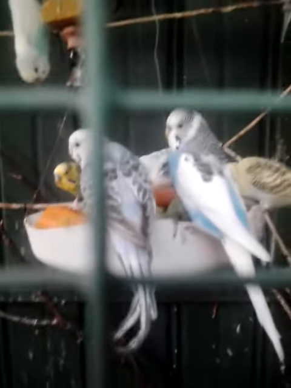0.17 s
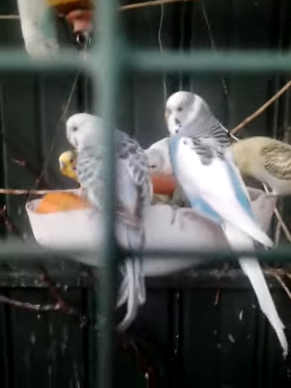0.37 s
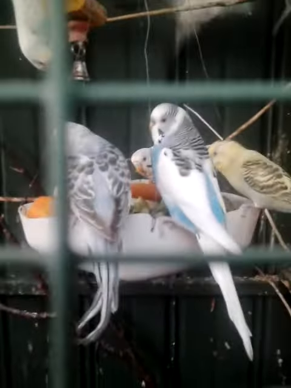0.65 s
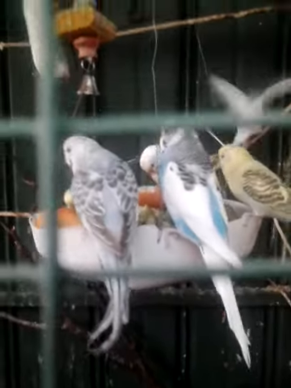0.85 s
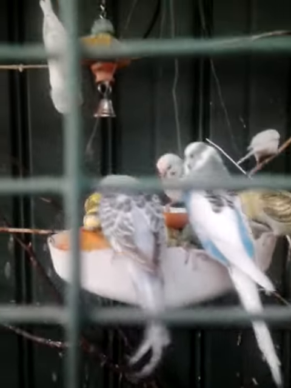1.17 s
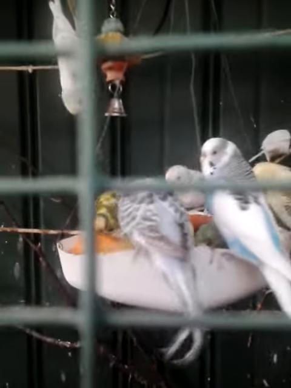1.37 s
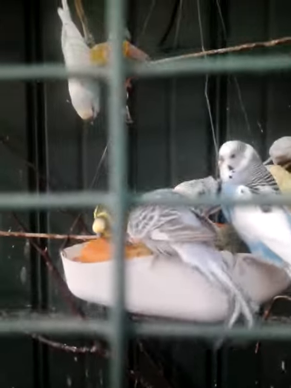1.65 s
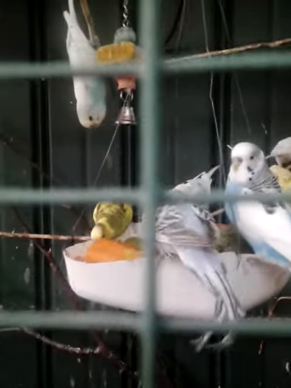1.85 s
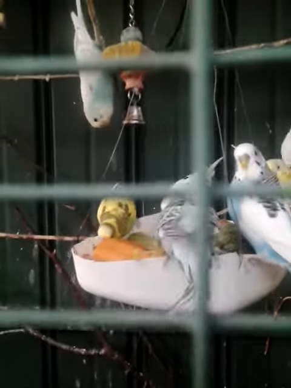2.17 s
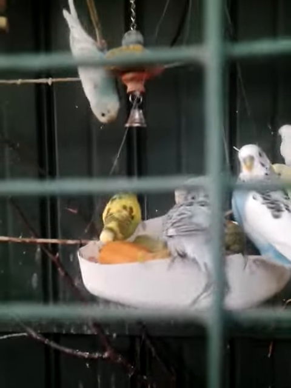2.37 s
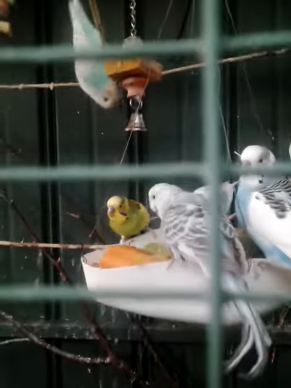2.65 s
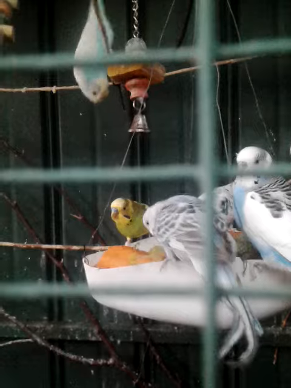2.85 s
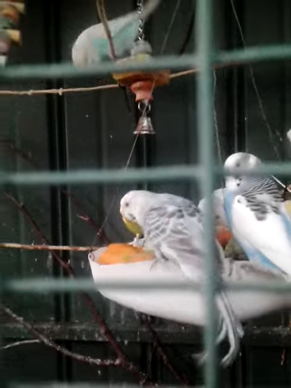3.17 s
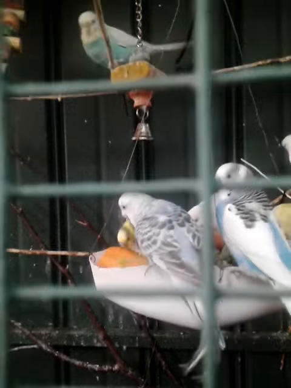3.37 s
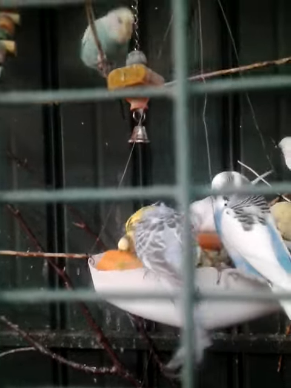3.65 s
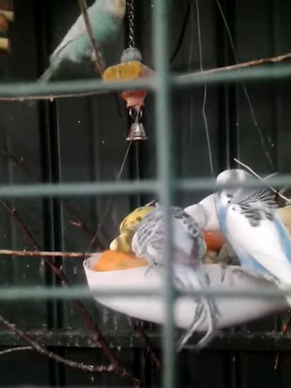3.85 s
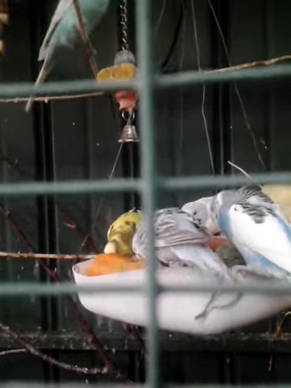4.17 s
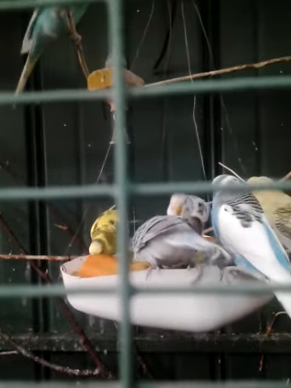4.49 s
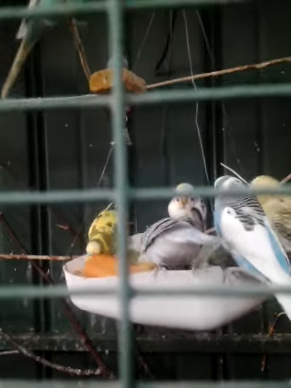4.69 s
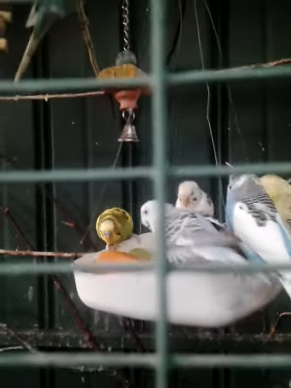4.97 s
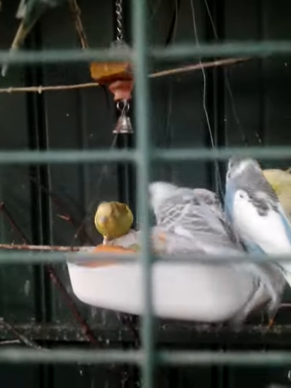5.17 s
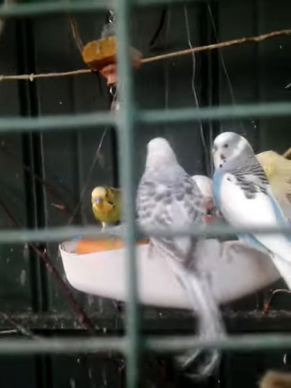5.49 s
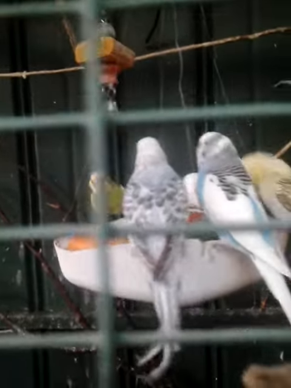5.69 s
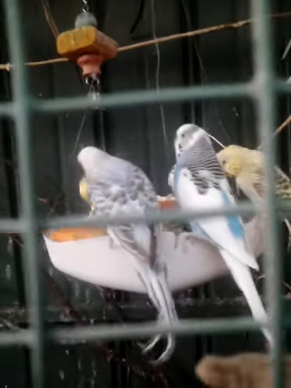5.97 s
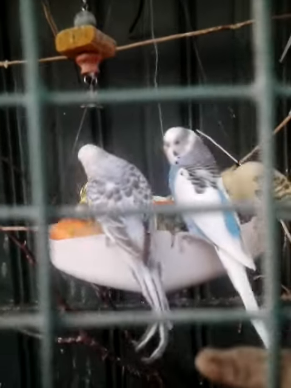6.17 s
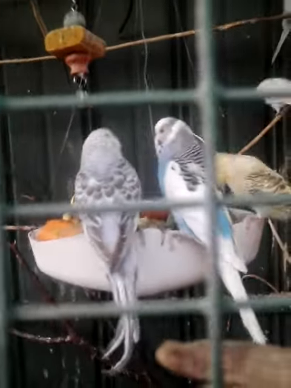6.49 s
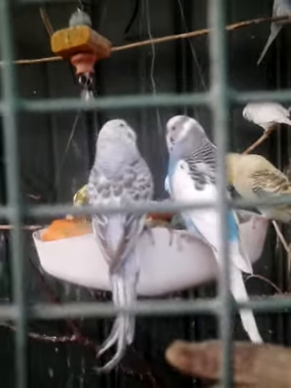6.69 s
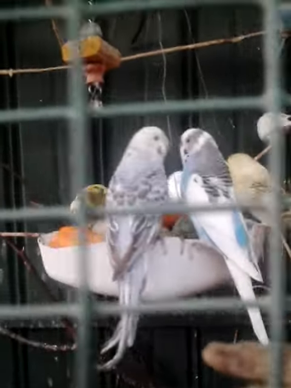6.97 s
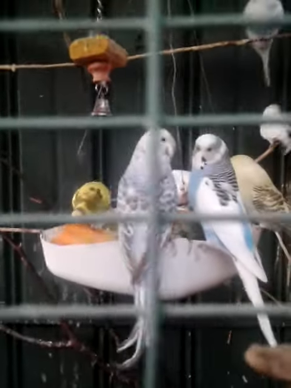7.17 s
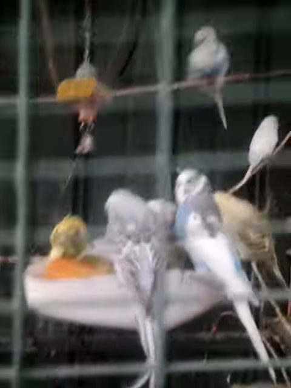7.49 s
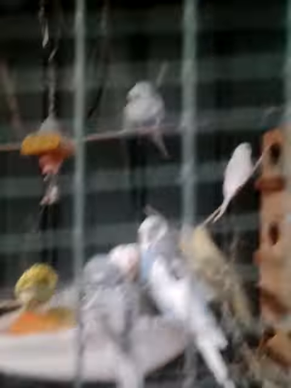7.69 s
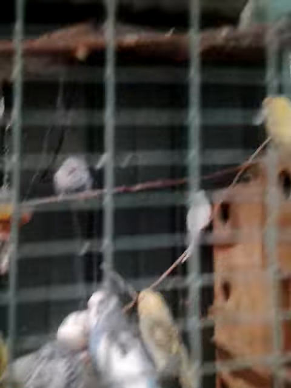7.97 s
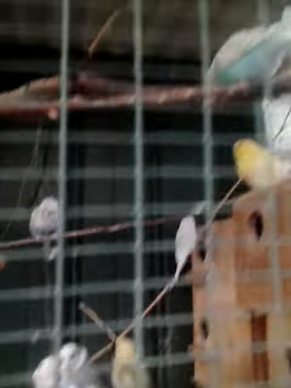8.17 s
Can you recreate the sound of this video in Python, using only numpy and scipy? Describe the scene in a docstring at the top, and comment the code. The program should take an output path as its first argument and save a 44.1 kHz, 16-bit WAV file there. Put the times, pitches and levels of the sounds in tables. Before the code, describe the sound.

A flock of small parrots trades short, high chirps and scolding squawks in an aviary, with a little wing flapping and faint pecking.

```python
"""A flock of budgerigars chatters at a food bowl in a sheet-metal aviary.
Thin membranes in each bird's voice box vibrate in quick gliding notes, clean or buzzy, and in harsh
scolding squawks. A four-note phrase keeps coming back, and the metal walls add short echoes.
One bird flutters to a perch, beaks and claws tick, and feathers ruffle.
Faint far-off whistles and a soft rumble and hiss lie underneath."""
import sys
import numpy as np
from scipy import signal
from scipy.fft import rfft, irfft
from scipy.io import wavfile

SR = 44100
rng = np.random.default_rng(int(sys.argv[2]) if len(sys.argv) > 2 else 0)


def pcm_store(signal):
    """Save signal as 16-bit PCM."""
    levels = np.round(np.clip(np.atleast_2d(signal), -1, 1) * 32767)
    wavfile.write(sys.argv[1], SR, levels.astype(np.int16).T)


N = 367794
TIME = np.arange(N) / SR

# Pitch shapes: multiples of a note's base pitch, at even steps from start to end
SLIDE = [0.96, 0.92, .85, .71, .68]
SAG = [0.98, .88, .8, .73]
DIVE = [1, .87, .74, 0.53, 0.434]
ARCH = [0.8, 0.9, 0.97, .9, .74, 0.49]
RISE = [.77, .88, .96, 1]
HOLD = [1.01, 0.97]
# Gliding notes: t/s, length/s, base pitch f/Hz, level/dB
SLIDES = [(1.432, 0.066, 3720, -29.5), (2.3, 0.026, 4100, -29), (2.6, 0.055, 3500, -36.5),
          (4.219, 0.055, 3270, -37), (4.37, 0.032, 3640, -37), (4.708, 0.059, 4170, -39.5),
          (5.129, 0.025, 4930, -23.5), (6.551, 0.045, 3046, -24), (7.8, 0.059, 4140, -39.5)]   # chirps that slide down
SAGS = [(1.291, 0.076, 1896, -46), (2.333, 0.056, 2675, -35), (2.512, 0.044, 1688, -40.5),
        (2.87, 0.04, 2720, -32.5), (6.335, 0.042, 2000, -38), (6.576, 0.043, 2156, -27),
        (6.593, 0.054, 3930, -27)]   # lower notes that sink gently
DIVES = [(5.886, 0.017, 2740, -29.5), (6.172, 0.013, 2540, -34.5), (6.226, 0.04, 2885, -32),
         (6.628, 0.014, 1837, -35.5)]   # steep drops that end a call
ARCHES = [(1.487, 0.054, 3593, -22.5), (2.207, 0.041, 3735, -25.5), (2.42, 0.03, 1506, -40),
          (2.818, 0.045, 3900, -23.5), (4.294, 0.062, 3450, -33.5), (4.402, 0.032, 3225, -27.5),
          (6.187, .04, 3970, -21.5), (6.355, .038, 4360, -25.5), (7.399, 0.055, 3390, -25)]   # notes that swing up, then fall
RISES = [(1.385, 0.017, 3350, -38), (1.41, 0.031, 2650, -38.5), (2.562, 0.043, 4490, -44),
         (2.645, 0.031, 4440, -40.5), (3.106, 0.05, 3176, -31.5), (4.201, 0.037, 4800, -41.5),
         (4.381, 0.043, 6370, -51), (4.756, .065, 3566, -36), (5.109, 0.028, 5120, -25.5),
         (5.512, 0.021, 3510, -42.5), (6.13, 0.014, 3870, -36), (6.369, 0.084, 2595, -36.5),
         (6.527, .035, 3410, -25.5), (7.753, 0.1, 4410, -45), (7.869, 0.018, 4530, -32)]   # notes that climb
# Notes held near one pitch: t/s, length/s, f/Hz, level/dB, roughness (0 is clean)
HELD_NOTES = [(0, 0.034, 2800, -36, 0.75), (0.03, 0.047, 2634, -39.5, 0.76),
              (1.655, 0.035, 3780, -32.5, 0.18), (1.694, 0.09, 3725, -38, 0.06),
              (2.541, 0.12, 1089, -42.5, 0), (2.758, 0.02, 2413, -29.5, 0.16),
              (2.798, 0.019, 2860, -26, 0.08), (2.968, 0.032, 6230, -14.5, 0.02),
              (3.025, 0.016, 6250, -15.5, 0.3), (3.084, .012, 3570, -27, 0.4),
              (3.692, 0.021, 2310, -47.5, 0.83), (4.284, 0.029, 3210, -34.5, 0.72),
              (4.67, 0.023, 2960, -41.5, .9), (4.876, 0.024, 5890, -26.5, 0.1),
              (5.549, 0.071, 2400, -43.5, 1.1), (6.323, 0.011, 1820, -43, 0.9),
              (6.417, .024, 3500, -25.5, 0.36), (6.439, 0.012, 5660, -28, 0.1),
              (6.44, 0.018, 2790, -23.5, 0.2), (6.508, 0.023, 2080, -27, 0.53),
              (6.588, 0.038, 3010, -25, 0.25), (6.923, 0.0093, 2063, -36, 1.1)]
def chatter():
    """The flock trades six kinds of short note; each gliding kind has a set roughness."""
    out = np.zeros(N)
    kinds = [(SLIDE, SLIDES, .18), (SAG, SAGS, .27), (DIVE, DIVES, .25),
             (ARCH, ARCHES, .18), (RISE, RISES, .42)]
    for shape, notes, rough in kinds:
        for start, length, hz, db in notes:
            add(out, start, chirp(shape, length, hz, db, rough))
    for start, length, hz, db, rough in HELD_NOTES:
        add(out, start, chirp(HOLD, length, hz, db, rough))
    return out


def chirp(shape, length, hz, db, rough=0.11, flutter_db=4.0, wobble=.022):
    """One fluttering note wobbles along a pitch shape and gets rougher as it sinks."""
    n = int(length * SR)
    glide = np.interp(np.linspace(0, len(shape) - 1, n), np.arange(len(shape)), shape)
    pitch = hz * glide * (1 + wobble * wander(n, 170))
    tone = whistle(pitch, np.minimum(rough + (1 - glide) ** 2, 1))
    flutter = from_db(flutter_db * wander(n, 120))
    return from_db(db) * wall_echoes(unit_power(tone * swell(n, crest=0.42) * flutter))


# How well throat and beak pass each frequency: f/Hz, level/dB
VOICE_COLOUR = [(1000, -15.5), (2600, 0), (3450, 2), (4900, -3), (7600, -1.5), (11000, -14.5)]
def whistle(pitch, rough):
    """A tone and two overtones pass through throat and beak; a forced voice has stronger overtones."""
    phase, strength = voice_box(pitch, rough, buzz_hz=420, jitter=.11, buzz_depth=.2)
    step_db = -19 + 11 * rough + 3 * wander(len(pitch), 170)   # from one overtone to the next
    return strength * sum(from_db(at_hz(VOICE_COLOUR, k * pitch) + (k - 1) * step_db) * np.sin(k * phase)
                          for k in range(1, 4))


def voice_box(pitch, rough, buzz_hz, jitter, buzz_depth):
    """Membranes vibrate while a fast, uneven buzz shakes their pitch and strength."""
    n = len(pitch)
    buzz = np.sin(phase_of(buzz_hz * (1 + .5 * wander(n, 100))))
    shaken = pitch * (1 + rough * (jitter * wander(n, 700) + buzz_depth * buzz))
    return phase_of(shaken), np.exp(.5 * rough * buzz)


# The returning phrase: t/s, level/dB of its last note
PHRASES = [(2.023, -26), (5.714, -28.5), (6.012, -20.5), (7.22, -25)]
def phrases():
    """A pip, an upward flick, a dive and a louder slide, always in the same rhythm."""
    out = np.zeros(N)
    for start, db in PHRASES:
        add(out, start, chirp(SAG, length=0.012, hz=3900, db=-36))
        add(out, start + 0.043, chirp(RISE, length=0.025, hz=4720, db=db - 25))
        add(out, start + 0.073, chirp(DIVE, length=0.046, hz=3450, db=db - 11.5))
        add(out, start + 0.132, chirp(SLIDE, length=0.04, hz=4100, db=db))
    return out


# Scolding squawks: t/s, length/s, f/Hz, level/dB
SQUAWKS = [(1.527, 0.0093, 2290, -29.5), (2.312, 0.029, 3050, -35), (2.674, 0.02, 3060, -30.5),
           (2.949, 0.052, 3145, -18), (3.002, 0.043, 3815, -16.5), (3.047, 0.028, 3750, -20),
           (5.154, 0.042, 4900, -17), (6.458, 0.046, 2840, -27.5), (7.879, 0.034, 4100, -24),
           (7.929, 0.022, 3485, -25.5)]
def squawks(throat_width_hz=1420, beak_hz=6190, beak_width_hz=2070, beak_db=-5, spurt_db=3):
    """Driven hard, the membranes shake wildly; tone and puffs of air ring in throat and open beak."""
    out = np.zeros(N)
    for start, length, hz, db in SQUAWKS:
        n = int(length * SR)
        phase, strength = voice_box(np.full(n, hz), 0.61, buzz_hz=248.7, jitter=0.092, buzz_depth=0.05)
        breathy_tone = strength * (np.sin(phase) + 3.2 * rng.standard_normal(n))
        throat = ring(breathy_tone, hz, throat_width_hz)
        beak = from_db(beak_db) * ring(breathy_tone, beak_hz, beak_width_hz)
        spurts = from_db(spurt_db * wander(n, 180))
        voice = filtered(throat - beak, 1900, "high", order=4) * spurts
        add(out, start, from_db(db) * wall_echoes(unit_power(voice * swell(n, crest=0.33))))
    return out


# The path of one unbroken rasping call: t/s, f/Hz before the dips, level/dB
RASP = [(4.877, 3242, -24.5), (4.939, 3533, -23.5), (4.969, 2900, -26), (4.998, 3000, -36.5),
        (5.025, 3804, -28), (5.044, 3840, -57)]
def rasp(dip=0.05, roll_db=0.5):
    """A longer call rolls in uneven pulses, its pitch dipping on each."""
    out = np.zeros(N)
    start, end = RASP[0][0], RASP[-1][0]
    hz, db = (column[(TIME >= start) & (TIME < end)] for column in in_time(RASP))
    roll = wander(len(hz), 300)
    pitch = hz / (1 + dip * np.exp(roll))
    tone = whistle(pitch, rough=0.28) * from_db(-roll_db * roll)
    add(out, start, wall_echoes(from_db(db) * unit_power(tone)))
    return out


# How loud the wings are: t/s, level/dB
FLIGHT = [(.45, -70.5), (.58, -48.5), (.86, -44), (.94, -37.5), (1.08, -48), (1.25, -66), (2.27, -68.5),
          (2.37, -43.5), (2.62, -62)]
# Tone colour of the air they push: f/Hz, relative level/dB
WING_AIR = [(130, 2.5), (200, -4), (350, 8), (680, -9.5), (6400, -15.5), (14000, -78.5)]
def wings(beat_hz=17, beat_db=2.0):
    """Each wing stroke pushes a puff of air."""
    flight_db, = in_time(FLIGHT)
    strokes_db = beat_db * np.sin(2 * np.pi * beat_hz * TIME)
    return from_db(flight_db + strokes_db) * coloured_noise(WING_AIR)


# Knocks on wood: t/s, level/dB
TAPS = [(.775, -49), (.821, -38), (0.902, -33.5), (1.595, -45), (3.379, -48.5), (4.69, -40)]
def perch_taps():
    """Wings and claws strike the perches."""
    out = np.zeros(N)
    for start, db in TAPS:
        add(out, start, click(db, decay_s=0.017))
    return out


def pecks(count=30, db=-56, spread_db=8):
    """Beaks crack seed and tick on the bowl at random moments."""
    out = np.zeros(N)
    for when, softness in rng.random((count, 2)):
        add(out, when * N / SR, click(db - spread_db * softness, decay_s=0.0023))
    return out


def click(db, decay_s):
    """A quick hit makes a burst of noise that dies at once and echoes off the walls."""
    t = np.arange(SR // 10) / SR
    noise = unit_power(filtered(rng.standard_normal(len(t)), [500, 7000], "band"))
    return from_db(db) * wall_echoes(noise * np.exp(-t / decay_s))


# Birds shaking out their feathers: t/s, length/s
RUFFLES = [(0.1, 0.41), (5.34, 0.35)]
def ruffles(gain_db=-55):
    """Feathers slide over each other in a soft swell of hiss."""
    out = np.zeros(N)
    for start, length in RUFFLES:
        n = int(length * SR)
        hiss = filtered(rng.standard_normal(n), [4000, 11000], "band")
        add(out, start, from_db(gain_db) * hiss * np.hanning(n))
    return out


# Faint calls from far off: t/s, length/s, f/Hz
FAR_CALLS = [(0.394, 0.18, 3855), (0.502, 0.093, 1315), (0.952, 0.22, 4980), (3.922, 0.14, 2770),
             (6.781, 0.42, 5240), (6.796, 0.63, 2570)]
def far_birds(db=-58, wobble=0.035):
    """Thin held whistles, blurred by distance."""
    out = np.zeros(N)
    for start, length, hz in FAR_CALLS:
        n = int(length * SR)
        tone = np.sin(phase_of(hz * (1 + wobble * wander(n, 500))))
        add(out, start, from_db(db) * wall_echoes(unit_power(tone * swell(n, crest=0.46))))
    return out


# How loud the background is: t/s, rumble level/dB, hiss level/dB
BACKGROUND = [(0, -66, -57.5), (1.15, -58, -65), (1.65, -56.5, -55), (1.9, -63.5, -63), (2.4, -59, -48),
              (2.9, -49.5, -57.5), (3.3, -56.5, -55.5), (3.85, -60.5, -62), (4.7, -56, -57.5),
              (5.45, -61, -52.5), (5.95, -57.5, -61.5), (7.0, -52, -51.5), (7.6, -52.5, -54.5),
              (8.3, -57.5, -61.5)]
# Tone colours of its two parts: f/Hz, relative level/dB
RUMBLE = [(50, -10), (74, 11.5), (380, -1), (650, -14), (1400, -40)]
HISS = [(700, -11.5), (1100, 0), (1700, -5.5), (2800, -3), (6000, -5.5), (8000, -26), (15000, -26)]
TOP_HZ = 15500   # upper edge of the hiss and of the microphone
def background(waver_hz=11, rumble_waver_db=1.3, hiss_waver_db=6):
    """A low outdoor rumble, and a hiss of feathers, husks and leaves whose bands swell separately."""
    rumble_db, hiss_db = in_time(BACKGROUND)
    rumble = from_db(rumble_db + rumble_waver_db * wander(N, waver_hz)) * coloured_noise(RUMBLE)
    edges_hz = np.geomspace(500, TOP_HZ, 8)
    hiss = np.zeros(N)
    for band in zip(edges_hz, edges_hz[1:]):
        noise = filtered(coloured_noise(HISS), band, "band")
        hiss += noise * from_db(hiss_waver_db * wander(N, waver_hz))
    return rumble + from_db(hiss_db) * unit_power(hiss)


def wall_echoes(sound, early_db=-3, early_s=0.13, tail_db=-14, tail_s=0.3):
    """Metal walls give each perch its own quick, dense echoes and a short, duller ring."""
    t = np.arange(SR // 2) / SR
    early = rng.standard_normal(len(t)) * from_db(-60 * t / early_s)
    tail = filtered(rng.standard_normal(len(t)), 5100, "low") * from_db(-60 * t / tail_s)
    early *= from_db(early_db) / np.linalg.norm(early)
    tail *= from_db(tail_db) / np.linalg.norm(tail)
    direct = t == 0
    heard = signal.fftconvolve(sound, direct + early + tail)
    return heard * np.linalg.norm(sound) / np.linalg.norm(heard)   # same energy as went in


def from_db(db):
    """Turn decibels into a multiplier."""
    return 10 ** (np.asarray(db) / 20)


def unit_power(x):
    """Scale a sound to an average power of 1."""
    return x / np.sqrt(np.mean(x ** 2) + 1e-20)


def phase_of(hz):
    """Add up a changing pitch into the angle of a sine wave."""
    return 2 * np.pi * np.cumsum(hz) / SR


def in_time(rows):
    """Join a table's points with lines: one value a sample for each column after time."""
    times, *columns = np.transpose(rows)
    return [np.interp(TIME, times, column) for column in columns]


def at_hz(colour, hz):
    """Read a tone colour's level at any frequency."""
    known_hz, db = np.transpose(colour)
    return np.interp(np.log(hz), np.log(known_hz), db)


def add(track, start, sound):
    """Mix a sound in at a start time in seconds."""
    i = max(0, round(start * SR))
    track[i:i + len(sound)] += sound[:N - i]


def filtered(x, hz, kind, order=2):
    """Keep the lows, the highs or a band between."""
    return signal.sosfilt(signal.butter(order, hz, kind, fs=SR, output="sos"), x)


def ring(x, hz, width_hz):
    """A hollow space favours the frequencies near its own."""
    return signal.lfilter(*signal.iirpeak(hz, hz / width_hz, SR), x)


def wander(n, hz):
    """A random wiggle of typical size 1, up to about the given rate."""
    run_in = SR // 10   # lets the filter settle
    noise = rng.standard_normal(max(n, SR // 2) + run_in)
    return unit_power(filtered(noise[:n + run_in], hz, "low")[run_in:])


def coloured_noise(colour):
    """Steady noise of a given tone colour, fading beyond the ends of its table."""
    hz = np.arange(N // 2 + 1) * SR / N + 1
    fade = (np.minimum(1, hz / colour[0][0]) * np.minimum(1, colour[-1][0] / hz)) ** 3
    spectrum = rfft(rng.standard_normal(N)) * from_db(at_hz(colour, hz)) * fade
    return unit_power(irfft(spectrum, N))


def swell(n, crest):
    """A note grows to its crest (a share of its length) and dies away."""
    progress = np.interp(np.linspace(0, 1, n), [0, crest, 1], [0, .5, 1])
    return np.sin(np.pi * progress) ** 0.36


def scene():
    """The flock's voices and movements over the outdoor background."""
    voices = chatter() + phrases() + squawks() + rasp()
    movements = wings() + perch_taps() + pecks() + ruffles()
    return (voices + movements + far_birds() + background())[None]


def record(dry):
    """The loudest peaks are softly rounded; the microphone dulls the treble and cuts the very top."""
    rounded = 1.2 * np.tanh(dry / 1.2)
    body = filtered(rounded, 8330, "low", order=8)
    treble = from_db(-8) * filtered(rounded, [8200, 13200], "band")
    top_cut = signal.cheby1(10, .5, TOP_HZ, fs=SR, output="sos")
    return signal.sosfilt(top_cut, body + treble)


dry = scene()
out = record(dry)
pcm_store(out)
```